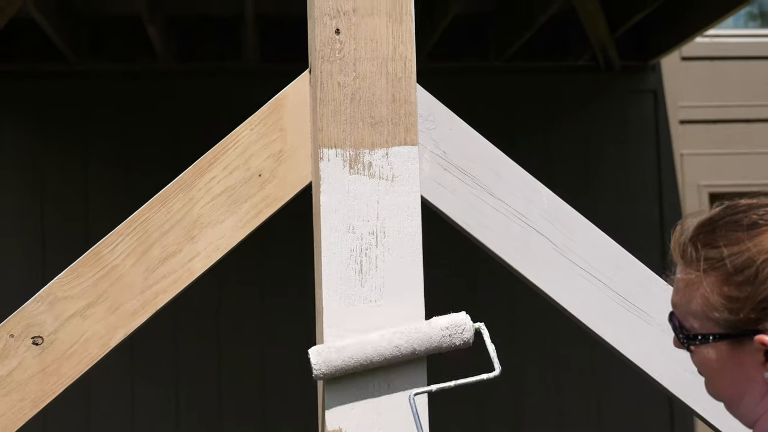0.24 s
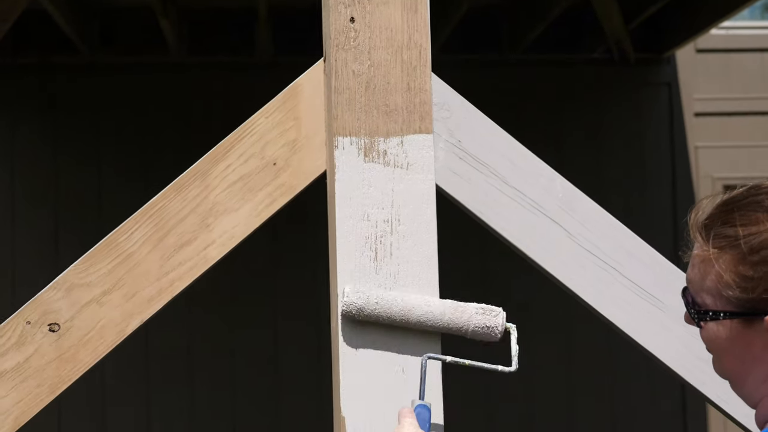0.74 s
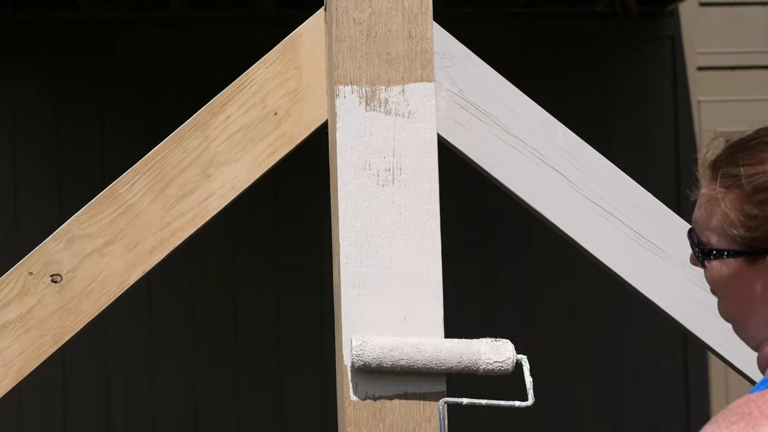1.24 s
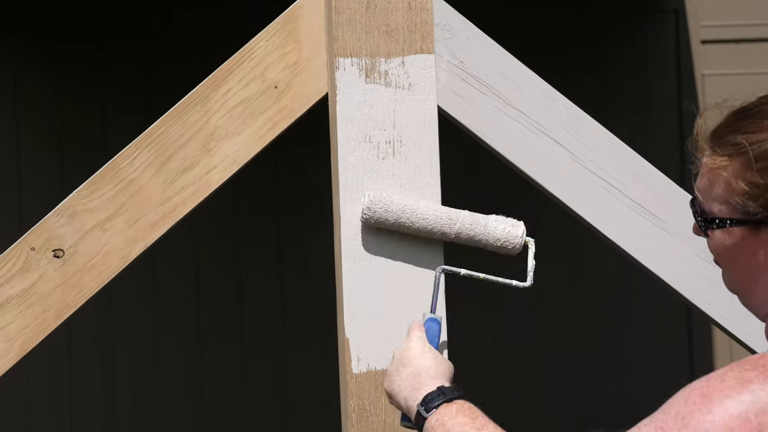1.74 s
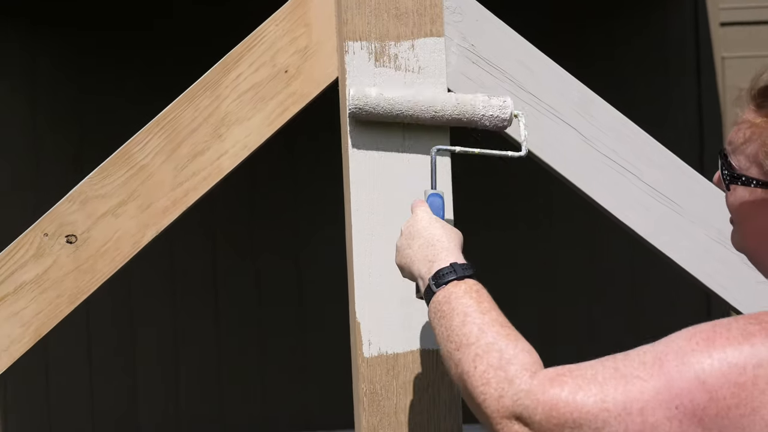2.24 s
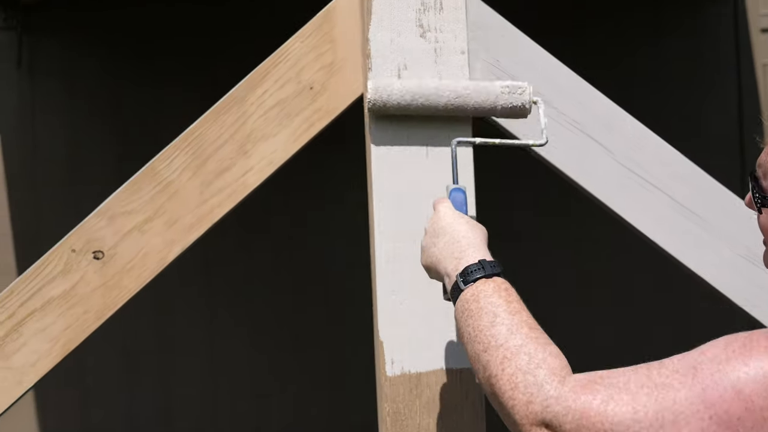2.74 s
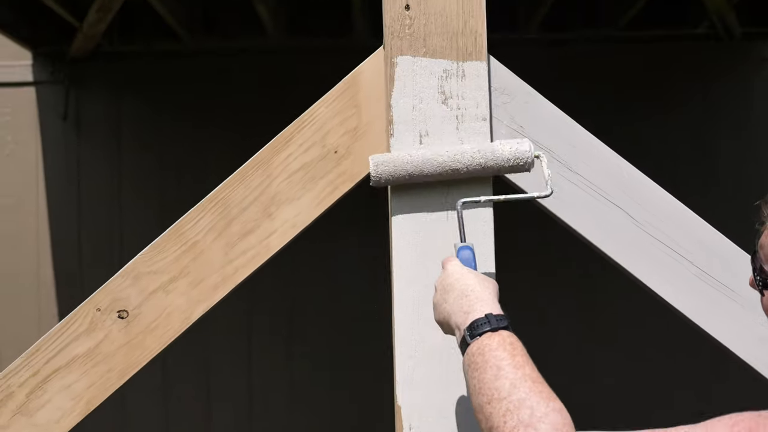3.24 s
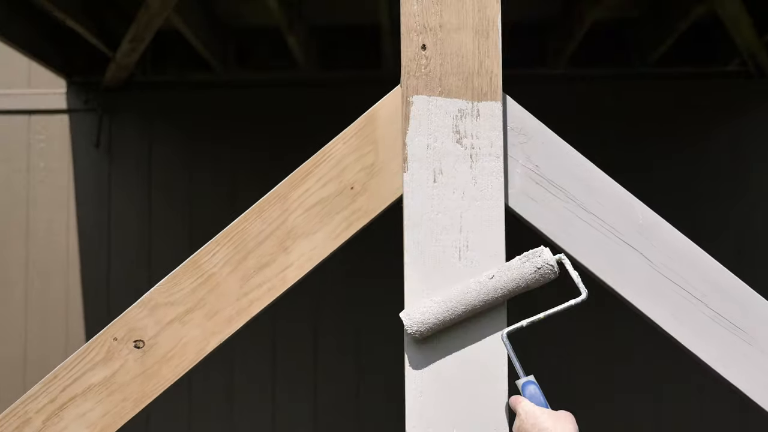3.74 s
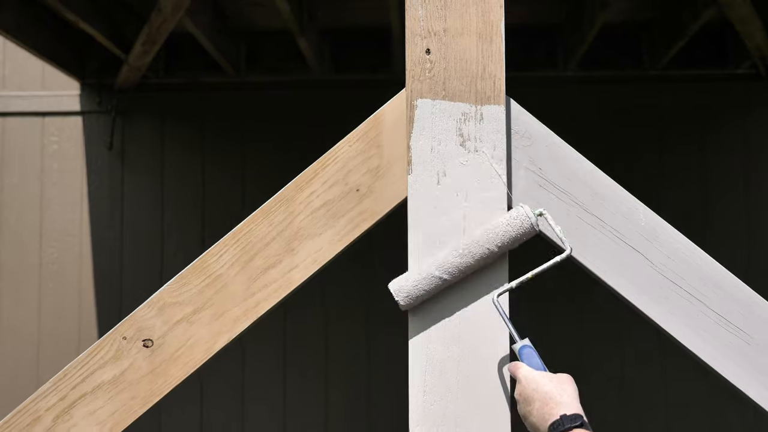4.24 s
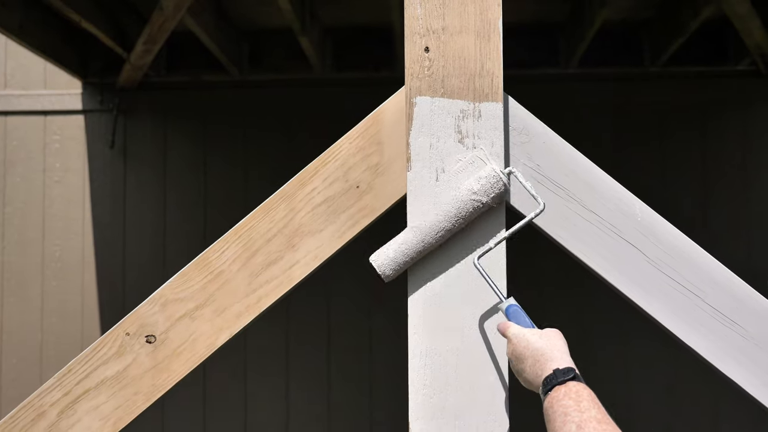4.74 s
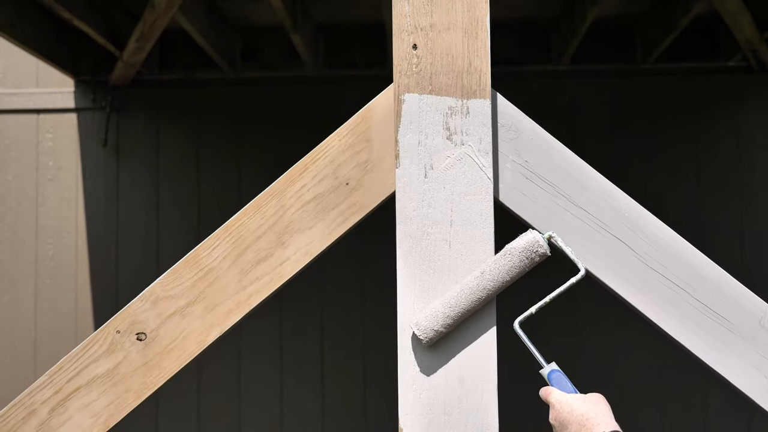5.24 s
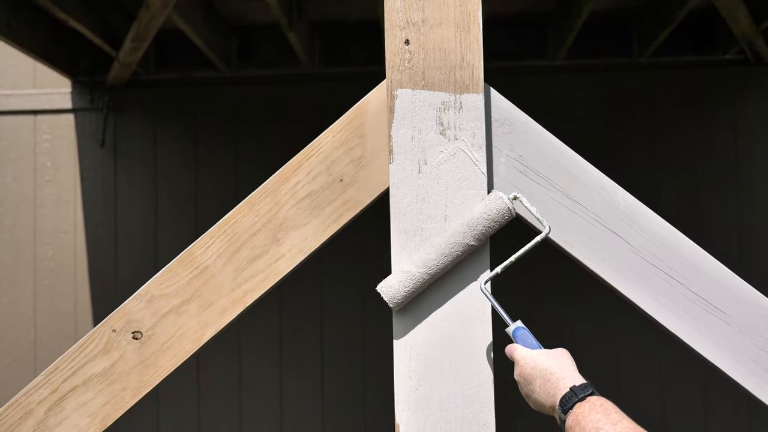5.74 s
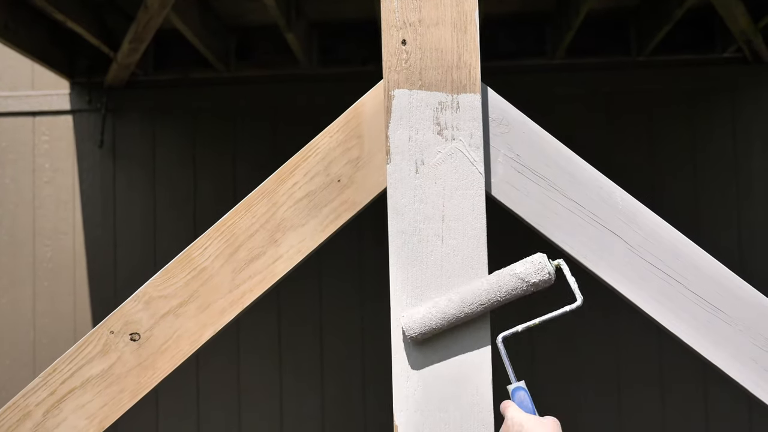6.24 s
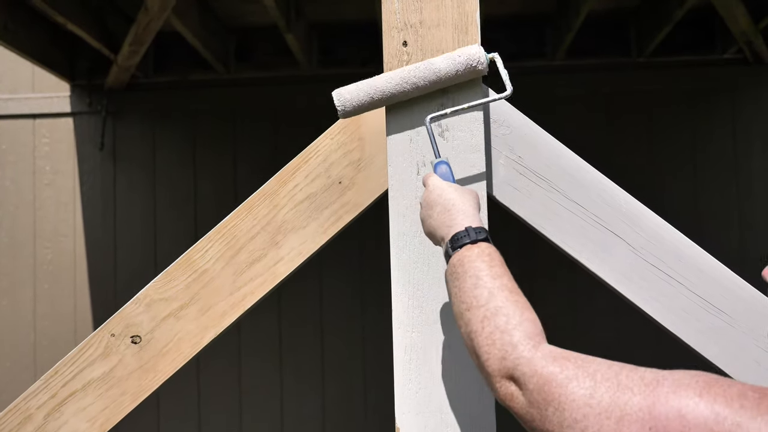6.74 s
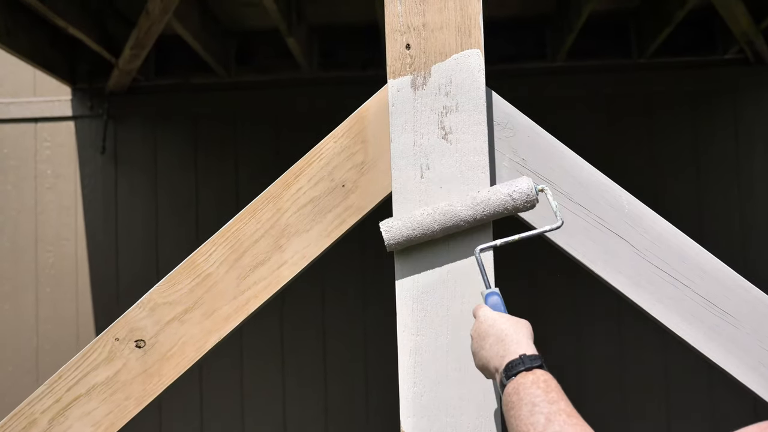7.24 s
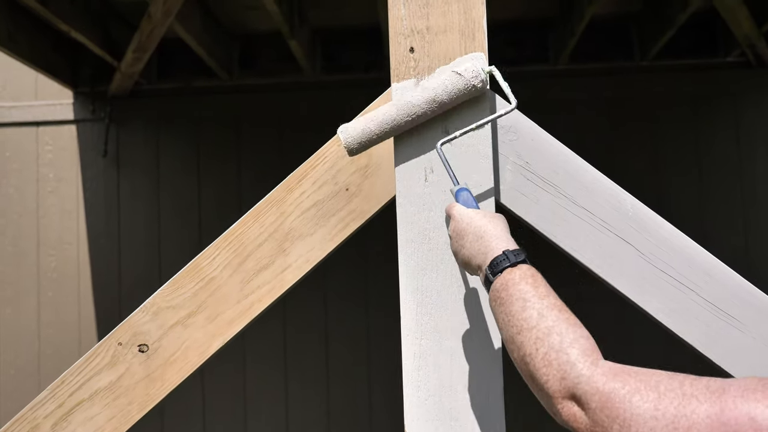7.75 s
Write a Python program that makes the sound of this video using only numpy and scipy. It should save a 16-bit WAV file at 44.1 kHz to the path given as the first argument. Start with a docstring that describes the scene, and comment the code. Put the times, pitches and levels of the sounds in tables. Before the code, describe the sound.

Outdoors, a wet paint roller runs up and down a wooden post close to the microphone, each stroke a fine sticky hiss over a soft wooden murmur. A gust buffets the microphone at first and dies away as a bird whistles farther off. The wire frame knocks lightly now and then. Past the middle the bird returns with looping notes, the roller judders once and its axle gives a sharp squeak. Faint traffic and machinery hum underneath.

```python
"""A wet paint roller runs up and down a wooden post, outdoors and close to the microphone: its nap
peels off the stain with a fine sticky hiss and the post murmurs under it. The axle squeaks, the wire
frame knocks, and there is one low judder. Farther off, a bird whistles looping notes that echo between
buildings. A gust buffets the microphone and dies away over distant traffic and the hum of machinery.
The sound is mono, the same in both channels."""
import sys
import numpy as np
from scipy import signal
from scipy.fft import rfft, irfft, next_fast_len
from scipy.io import wavfile
from scipy.ndimage import uniform_filter1d

SR = 44100
rng = np.random.default_rng(int(sys.argv[2]) if len(sys.argv) > 2 else 0)


def generate_wav(signal):
    """Clip the signal to [-1, 1] and save it as 16-bit WAV at the path in sys.argv[1]."""
    frames = np.transpose(np.atleast_2d(signal))
    scaled = np.clip(frames, -1, 1) * 32767
    pcm = np.round(scaled).astype(np.int16)
    wavfile.write(sys.argv[1], SR, pcm)


N = 353180
T = np.arange(N) / SR

# the far wash of the neighbourhood: (frequency [Hz], relative density [dB])
WASH_SPECTRUM = [(20, 5), (60, 8.5), (110, 8.5), (170, 2.5), (330, -1.5), (600, -2), (1000, -4),
                 (1700, -6.5), (2000, -12), (3700, -14), (5000, -23), (6200, -31), (10000, -38.5),
                 (15700, -46)]
# traffic far off: (time [s], level [dB])
TRAFFIC_LEVELS = [(0, -75), (2, -57), (5.5, -54), (7.6, -54.5), (8.01, -48.5)]
# its tyre noise: (frequency [Hz], relative density [dB])
TYRE_SPECTRUM = [(250, -3), (470, 5.5), (720, 1), (1100, -4.5), (2000, -35), (5000, -39)]
# a far engine gathering speed: (time [s], firing rate [Hz], level [dB])
ENGINE_RUN = [(5.6, 77.8, -75), (6.0, 84, -61), (6.95, 96.9, -43), (7.5, 100, -50), (8.01, 108.8, -51.5)]
# distant machinery: (frequency [Hz], width [Hz], level [dB])
MACHINE_HUMS = [(134.4, 9.2, -53.5), (208, 36, -56)]

# gusts on the microphone: (time [s], relative level [dB], half length [s])
MIC_GUSTS = [(0.003, -13, 0.13), (0.22, -10, 0.056), (.405, -13, 0.039), (0.723, -27, 0.23),
             (1.322, -28.5, 0.13), (2.347, -39, 0.38), (3.29, -35.5, 0.2), (4.204, -37.5, 0.24)]
# the dull buffeting of slow air: (frequency [Hz], relative density [dB])
BUFFET_SPECTRUM = [(3, 11), (10, 2), (20, 3.5), (32, -11), (50, -19), (75, -25.5), (120, -41.5), (200, -58),
                   (400, -87)]
# the flutter a strong gust adds: (frequency [Hz], relative density [dB])
FLUTTER_SPECTRUM = [(35, -2.5), (55, 14.5), (80, -16), (130, -7), (200, -20), (400, -45), (1000, -73.5)]

# the bird's rising call (two lead-in notes, an upsweep, a flick up and down):
# (offset [s], length [s], start pitch [Hz], end pitch [Hz], relative level [dB])
RISING_GLIDES = [(-.062, 0.011, 2390, 2570, -6), (-.016, 0.024, 2650, 2880, -8),
                 (.006, 0.047, 3020, 3830, -3), (.095, 0.019, 4040, 5520, -17),
                 (.112, .012, 5200, 4100, -14.5)]
# its falling call, three steps down:
# (offset [s], length [s], start pitch [Hz], end pitch [Hz], relative level [dB])
FALLING_GLIDES = [(-.008, .03, 3227, 3045, -0.5), (.028, 0.0201, 2963, 2476, -3),
                  (.06, .048, 2420, 2290, -8)]
# each rising call: (time [s], relative level [dB], send to the yard [dB])
RISING_CALLS = [(.142, -30.5, -9), (.535, -33, -5.5), (4.789, -40, -2.5), (5.175, -41, 1), (5.558, -38, 0),
                (5.953, -43, 4)]
# each falling call: (time [s], relative level [dB], send to the yard [dB])
FALLING_CALLS = [(-.05, -48.5, 2), (.292, -45, 2), (0.691, -39, -7.5), (4.56, -49.5, -7),
                 (4.952, -44, -4.5), (5.338, -41.5, -6), (5.724, -41.5, -5.5), (6.121, -45, -4)]
# echoes off nearby walls: (delay [s], level against the direct sound [dB])
WALL_ECHOES = [(.022, -1), (.041, -8.5)]

# a low judder: (time [s], level [dB])
JUDDER_LEVELS = [(5.43, -70), (5.475, -40), (5.52, -48), (5.6, -37.5), (5.68, -34.5), (5.76, -66)]
# its resonances: (frequency [Hz], relative level [dB], t60 [s])
JUDDER_RESONANCES = [(130.7, -4, 0.059), (222.3, -1.5, 0.062), (277, -4.5, 0.039), (423, -14.5, 0.058)]
# the roller meeting the post: (time [s], relative level [dB], decay time [s], wood resonance [Hz],
# frame resonance [Hz], frame gain [dB], clatter gain [dB])
POST_KNOCKS = [(1.823, -49, 0.03, 1420, 4200, -9, 2), (1.836, -40, .012, 1610, 4500, -5, 0.5),
               (1.85, -47, 0.032, 294, 4300, -19, -6), (3.995, -45, .0098, 1610, 3700, -5, -23),
               (7.562, -36, 0.0075, 616, 3980, -5.5, -1), (7.577, -42.5, 0.023, 590, 3650, -15, 0)]
# clatter of roller and frame: (frequency [Hz], relative density [dB])
CLATTER_SPECTRUM = [(230, 11), (420, -15), (700, 12), (1100, 5), (1600, 1), (2000, -3), (3200, -8),
                    (4400, -10), (5900, -8), (8500, -19), (12000, -46), (15700, -55.5)]
# the roller turning on its axle: (time [s], pitch [Hz], peak [dB], width [s], pitch waver [fraction])
AXLE_SQUEAKS = [(1.145, 5367, -60, .012, 0.0035), (1.148, 7700, -52, 0.011, .004),
                (1.145, 10320, -58, .012, .004), (6.397, 10100, -56, 0.014, .001),
                (6.63, 8480, -25.5, 0.0098, 0.0025), (6.647, 14850, -46, .003, .012),
                (6.75, 4600, -48.5, 0.019, 0.054)]

# strokes, up and down in turn: (start [s], fastest [s], end [s], hiss [dB], murmur [dB])
ROLLER_STROKES = [(-.15, -.01, 0.26, -50.5, -49.5), (0.31, 0.422, .56, -48.5, -49.5),
                  (0.55, 0.833, 1.05, -50, -48.5), (1.027, 1.275, 1.424, -50.5, -49),
                  (1.393, 1.633, 1.74, -57, -52.5), (1.89, 1.993, 2.04, -60.5, -54.5),
                  (2.005, 2.273, 2.71, -49.5, -49.5), (2.626, 2.92, 3.08, -47.5, -48),
                  (3.07, 3.293, 3.49, -51, -49), (3.49, 3.674, 3.78, -49.5, -50.5),
                  (3.798, 3.97, 4.15, -51.5, -51), (4.184, 4.316, 4.42, -54.5, -56),
                  (4.447, 4.544, 4.66, -52, -48.5), (4.758, 4.85, 4.9, -61, -60),
                  (4.895, 5.217, 5.39, -64, -59), (5.478, 5.66, 5.88, -64.5, -51.5),
                  (5.818, 6.064, 6.15, -61.5, -56), (6.302, 6.65, 6.95, -51, -52.5),
                  (6.93, 7.16, 7.34, -53.5, -52.5), (7.307, 7.63, 7.74, -53, -50),
                  (7.8, 7.937, 8.1, -53, -50)]
# a wet patch of nap smacks free: (time [s], level [dB])
WET_SMACKS = [(.85, -56), (1.145, -58), (1.28, -45), (1.47, -62), (1.835, -56), (2.87, -53), (2.92, -51),
              (5.961, -59), (6.005, -57), (6.27, -56)]
# snapping threads of stain: (frequency [Hz], relative density [dB])
PEEL_SPECTRUM = [(1800, -2), (2600, -0.5), (3600, 6), (4400, -3), (5000, -2.5), (5800, -9), (6900, -1.5),
                 (8200, -0.5), (10500, -5.5), (13000, -14.5), (15700, -22)]
# the post under the rolling nap: (frequency [Hz], relative density [dB])
POST_SPECTRUM = [(150, -39), (220, -2.5), (400, -2), (800, 1), (1250, 3), (1600, 5.5), (2000, 0.5),
                 (3600, -2), (4800, -11), (6500, -35)]


def from_db(db):
    """Decibels to gain."""
    return 10 ** (np.asarray(db) / 20)


def unit_power(x):
    """Scale to an RMS of one."""
    return x / np.sqrt(np.mean(x ** 2) + 1e-20)


def power_sum(levels):
    """Unrelated sounds add in power."""
    return np.sqrt(sum(level ** 2 for level in levels))


def level_curve(rows):
    """Join (time, dB) points into a gain at every sample."""
    return from_db(np.interp(T, *np.transpose(rows)))


def arch(start, top, end):
    """Swell smoothly from nothing to one and back."""
    return np.sin(np.pi / 2 * np.interp(T, [start, top, end], [0, 1, 0]))


def bell(time, half_s):
    """A rounded bump of height one."""
    return np.exp(-np.minimum(((T - time) / half_s) ** 2, 100) / 2)


def shaped(x, gain_at):
    """Filter by a gain that is a function of frequency; unit power."""
    size = next_fast_len(N)
    hz = np.maximum(np.arange(size // 2 + 1) * SR / size, 1)
    return unit_power(irfft(rfft(x, size) * gain_at(hz), size)[:N])


def coloured(x, spectrum):
    """Give a sound a spectrum that falls away below its first point; unit power."""
    hz, db = np.transpose(spectrum)
    return shaped(x, lambda f: from_db(np.interp(np.log(f), np.log(hz), db))
                  * np.minimum(f / hz[0], 1) ** 2)


def drift(rate_hz):
    """A random wander with a spread of one."""
    return shaped(rng.standard_normal(N), lambda f: 1 / (1 + (f / rate_hz) ** 2))


def clicks(per_s, spread_db):
    """Random clicks of uneven size."""
    sizes = from_db(spread_db * np.minimum(rng.exponential(1, N), 5))
    return sizes * rng.choice([-1, 1], N) * (rng.random(N) < per_s / SR)


def ring(x, modes):
    """Decaying sines set going by each click; unit power."""
    out = 0
    for k, (hz, db, t60) in enumerate(modes):
        radius, angle = np.exp(-np.log(1000) / (t60 * SR)), 2 * np.pi * hz / SR
        feedback = [1, -2 * radius * np.cos(angle), radius * radius]
        out = out + (-1) ** k * signal.lfilter([0, from_db(db) * np.sin(angle)], feedback, x + 1e-18)
    return unit_power(out)


def yard(x, t60, first_s):
    """Diffuse scatter from trees and buildings, reaching the microphone first_s late."""
    t = T[:SR]
    onset = np.clip(t / first_s - 1, 0, 1)
    tail = rng.standard_normal(SR) * np.exp(-np.log(1000) * t / t60) * onset
    return signal.fftconvolve(x, tail / np.linalg.norm(tail))[:N]


def neighbourhood():
    """In the distance: a steady wash, tyre noise, one engine's firing tone and wavering machine hums."""
    out = from_db(-44.5) * coloured(rng.standard_normal(N), WASH_SPECTRUM)
    out += level_curve(TRAFFIC_LEVELS) * coloured(rng.standard_normal(N), TYRE_SPECTRUM)
    times, firing_hz, engine_db = np.transpose(ENGINE_RUN)
    pitch = np.interp(T, times, firing_hz) * (1 + 0.0386 * drift(11.7))
    engine_level = from_db(np.interp(T, times, engine_db) + 2 * drift(8.9))
    out += engine_level * np.sin(2 * np.pi * np.cumsum(pitch) / SR)
    for hz, width, db in MACHINE_HUMS:
        hum = shaped(rng.standard_normal(N), lambda f: 1 / (1 + ((f - hz) / width * 2) ** 2))
        out += from_db(db) * hum
    return out


def wind():
    """Eddies right at the microphone; small quick ones grow faster with the gust than large ones."""
    eddies = coloured(rng.standard_normal(N), BUFFET_SPECTRUM)
    eddies /= np.sqrt(uniform_filter1d(eddies ** 2, size=SR // 7))   # evened out over 1/7 s
    breeze, dying_wind = from_db(-46), from_db(-27 - 5.5 * T)
    gusts = [from_db(db) * bell(time, half_s) for time, db, half_s in MIC_GUSTS]
    strength = power_sum([breeze, dying_wind] + gusts)
    flutter = coloured(rng.standard_normal(N), FLUTTER_SPECTRUM)
    return from_db(3) * strength * eddies + from_db(-10.5) * strength ** 1.3 * flutter


def bird_call(glides, time):
    """Pitch and loudness of one call: each glide moves fast, then levels off, under an arched swell."""
    pitch, swell = np.zeros(N), np.zeros(N)
    for offset, length, from_hz, to_hz, db in glides:
        start = time + offset
        span = slice(*np.searchsorted(T, [start, start + length]))
        progress = np.clip((T[span] - start) / length, 0, 1)
        pitch[span] = to_hz + (from_hz - to_hz) * (1 - progress) ** 1.6
        swell[span] = from_db(db) * np.sin(np.pi * progress) ** 0.26
    return pitch, swell


def whistles(glides, calls):
    """One pure whistle repeated with slight changes, echoed by the walls and smeared by the yard."""
    direct, scattered = np.zeros(N), np.zeros(N)
    waver, flutter = 1 + 0.012 * drift(70), from_db(2 * drift(60))
    for time, db, scatter_db in calls:
        pitch, swell = bird_call(glides, time)
        note = from_db(db) * swell * flutter * np.sin(2 * np.pi * np.cumsum(pitch * waver) / SR)
        direct += note
        scattered += from_db(scatter_db) * note
    # the highest notes scatter instead of coming back whole
    mirrored = signal.sosfilt(signal.butter(8, 4200, fs=SR, output="sos"), direct)
    echoes = sum(from_db(db) * np.interp(T - delay, T, mirrored, left=0) for delay, db in WALL_ECHOES)
    near = yard(scattered, t60=0.31, first_s=0.0023)
    far = yard(scattered, t60=1.0, first_s=0.022)
    return from_db(-3) * (direct + echoes) + from_db(4) * near + from_db(0.5) * far


def bird():
    """Off among the buildings, each loop of the song climbs, flicks and steps back down."""
    return whistles(RISING_GLIDES, RISING_CALLS) + whistles(FALLING_GLIDES, FALLING_CALLS)


def judder():
    """Uneven slips shake a few low resonances."""
    shake = ring(clicks(per_s=320, spread_db=1), JUDDER_RESONANCES)
    sounding = (T > JUDDER_LEVELS[0][0]) & (T < JUDDER_LEVELS[-1][0])
    return level_curve(JUDDER_LEVELS) * shake * sounding


def knocks():
    """At the post: a blow, then a short rattle that rings wood and frame over a broad clatter."""
    out = np.zeros(N)
    for time, db, decay_s, wood_hz, frame_hz, frame_db, clatter_db in POST_KNOCKS:
        age = T - time
        contacts = clicks(per_s=6000, spread_db=1)
        blow = from_db(0.5) * np.sin(2 * np.pi * wood_hz * age)
        wood = from_db(-2.5) * ring(contacts, [(wood_hz, 0, 10 / wood_hz)])
        frame = from_db(frame_db) * ring(contacts, [(frame_hz, 0, 16 / frame_hz)])
        clatter = from_db(clatter_db) * coloured(contacts, CLATTER_SPECTRUM)
        envelope = np.clip(age / 0.0012, 0, 1) * np.exp(-np.abs(age) / decay_s)
        out += from_db(db + 2.5) * envelope * (blow + wood + frame + clatter)
    return out + from_db(-7.5) * yard(out, t60=0.37, first_s=0.013)


def squeaks():
    """Close and almost dry: the axle sticks and slips for a moment at a high pitch."""
    out, waver = np.zeros(N), drift(255)
    for time, hz, db, width, waver_depth in AXLE_SQUEAKS:
        swell = 1 / (1 + ((T - time) / (1.3 * width)) ** 2) ** 2
        phase = 2 * np.pi * hz * np.cumsum(1 + waver_depth * waver) / SR
        out += from_db(db) * swell * np.sin(phase)
    return out + from_db(-34) * yard(out, t60=0.3, first_s=0.0072)


def roller():
    """Close up: faster rolling snaps more threads of stain and draws a louder murmur from the post."""
    speed, hisses, murmurs = np.zeros(N), [], []
    for start, fastest, end, hiss_db, murmur_db in ROLLER_STROKES:
        stroke_speed = arch(start, fastest, end)
        speed += stroke_speed
        hisses.append(from_db(hiss_db) * stroke_speed ** 1.51)
        murmurs.append(from_db(murmur_db) * stroke_speed ** 0.97)
    smacks = [from_db(db) * bell(time, half_s=0.012) for time, db in WET_SMACKS]
    creep_hiss, creep_murmur = from_db(-72), from_db(-62)   # the roller never quite rests
    snaps_per_s = 2300 + 4200 * speed
    flurries = from_db(1.7 * drift(90) + 0.9 * drift(14))   # the nap is clumpy
    snaps = clicks(snaps_per_s, spread_db=1) / np.sqrt(snaps_per_s) * flurries
    ticks = from_db(-9) * unit_power(clicks(per_s=350, spread_db=2.4))   # thick threads letting go
    peel = coloured(unit_power(snaps) + ticks, PEEL_SPECTRUM)
    wood = coloured(clicks(per_s=5000, spread_db=2.5) * flurries, POST_SPECTRUM)
    return power_sum(hisses + smacks + [creep_hiss]) * peel + power_sum(murmurs + [creep_murmur]) * wood


def scene():
    """One microphone by the post feeds both channels alike."""
    mono = roller() + squeaks() + knocks() + judder() + bird() + wind() + neighbourhood()
    return np.stack([mono, mono])


def record(dry):
    """The recorder cuts the top steeply."""
    cutoff_hz = 15700
    return signal.sosfilt(signal.ellip(10, 0.1, 80, cutoff_hz, fs=SR, output="sos"), dry)


dry = scene()
out = record(dry)
generate_wav(out)
```